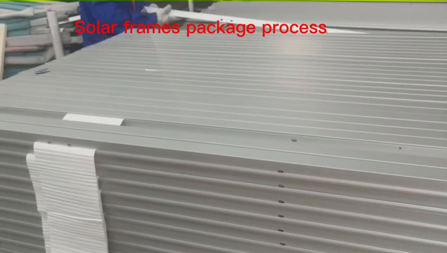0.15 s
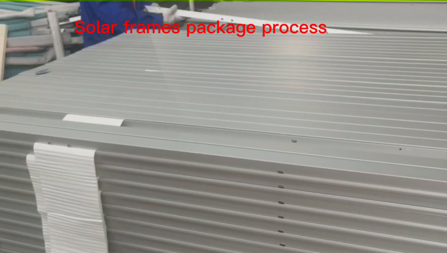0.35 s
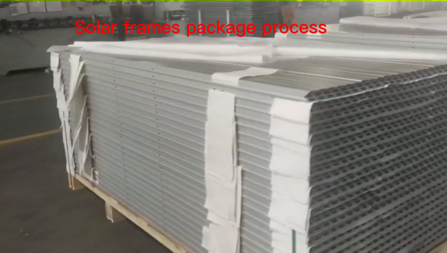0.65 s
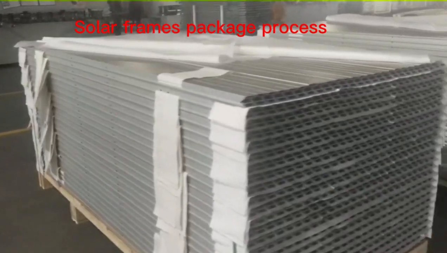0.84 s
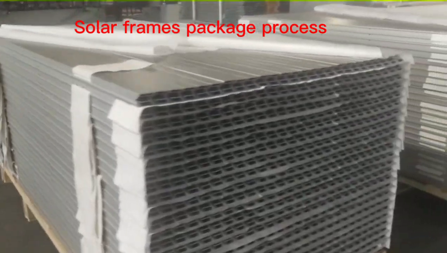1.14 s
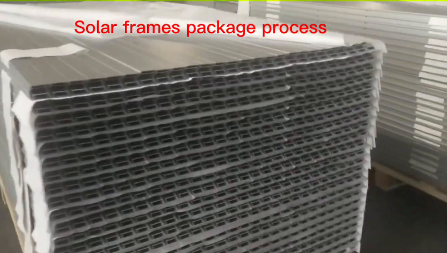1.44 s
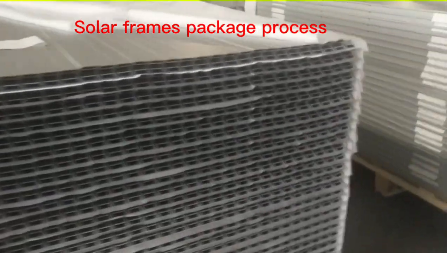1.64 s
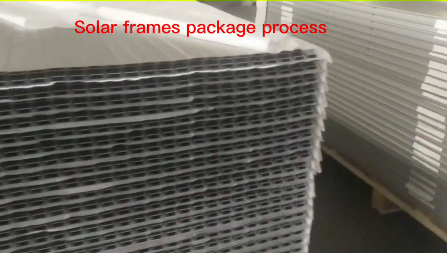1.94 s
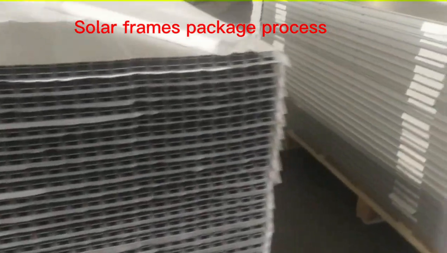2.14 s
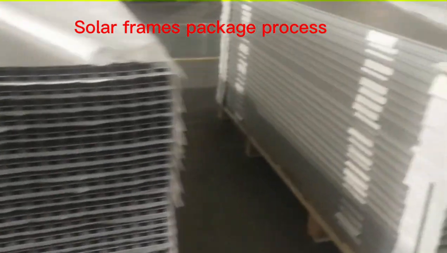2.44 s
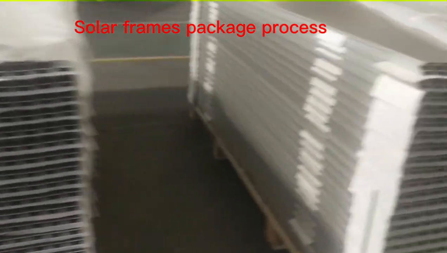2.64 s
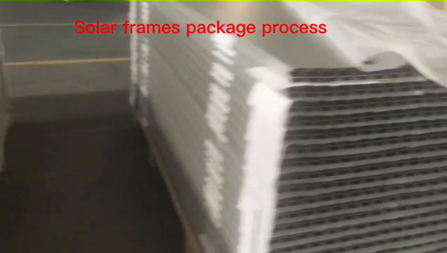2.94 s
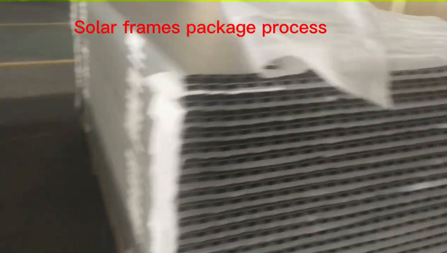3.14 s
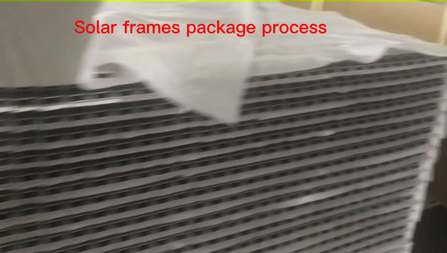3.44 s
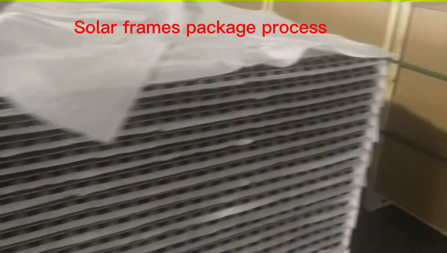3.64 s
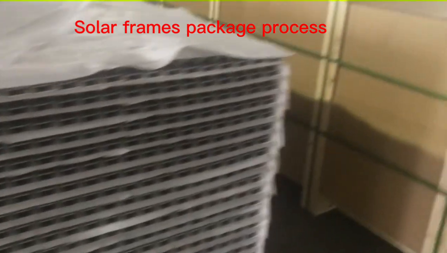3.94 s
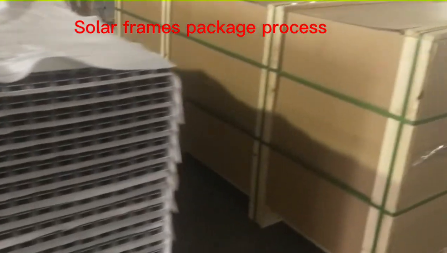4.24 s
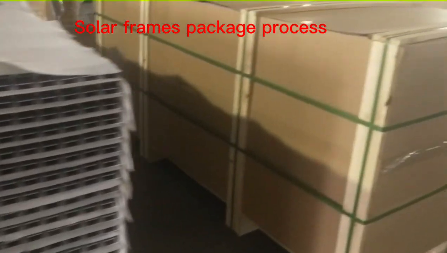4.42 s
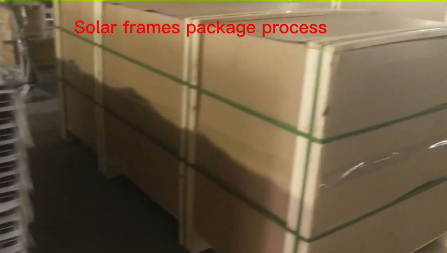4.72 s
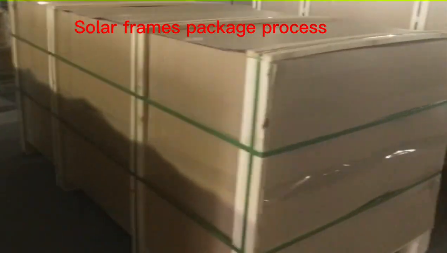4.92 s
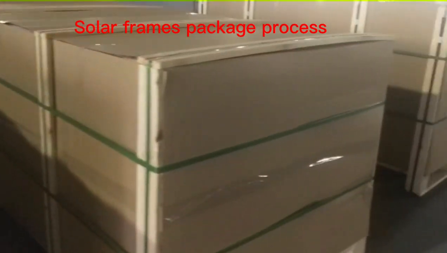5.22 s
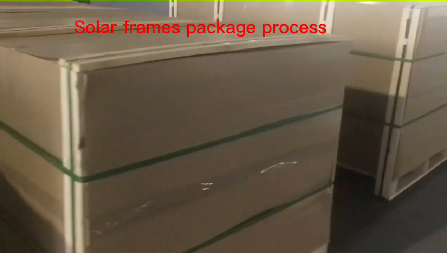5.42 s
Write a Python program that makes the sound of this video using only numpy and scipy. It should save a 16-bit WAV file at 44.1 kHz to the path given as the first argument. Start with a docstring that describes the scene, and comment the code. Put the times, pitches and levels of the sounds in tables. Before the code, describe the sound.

A busy, echoing factory hall heard in mono from a moving handheld microphone. Rough, shrill saw squeals near 3 kHz and their overtones are already under way at the start, sliding slightly downward. At 0.3 s everything cuts to complete silence, returning at 0.5 s, treble first and bass swelling after. A higher squeal around 4.3 kHz rings until about 1.2 s, fading quickly. Softer, trembling squeals overlap from 1.3 to 2.4 s, with gritty rasping at 2.0 and 2.3 s and a faint low boom. At 3.0 s the strongest piercing screech drops in pitch, with a bright rasp, and fades by 4 s, its echo trailing. A thin steady-pitched whine flutters in and out throughout the rest. Motor rumble, low hum and broad airy machine din continue, the rumble growing around 5.2 s. A short falling squeal and sharp scrape arrive at 5.4 s, just before the end.

```python
"""A factory hall where aluminium profiles are sawn: blades squeal and rasp, motors rumble and hum, air hisses.
Squeals are harmonic tones, most sliding down in pitch as the cut loads the blade; the hall smears them.
Rasps and passing noises are banded noise bursts; a thin whine swells and fades; rumble and din are shaped noise.
The sound drops out once near the start, then swells back in under a gain control that ducks loud sound."""
import sys
import numpy as np
from scipy import signal
from scipy.fft import rfft, irfft
from scipy.io import wavfile
from scipy.ndimage import uniform_filter1d, minimum_filter1d

SR = 44100
rng = np.random.default_rng(int(sys.argv[2]) if len(sys.argv) > 2 else 0)


def wrap_up_sound(samples):
    """Save the sound to the file named by the first command line argument, as 16-bit audio."""
    columns = np.atleast_2d(samples).T
    # keep every value between -1 and 1, then stretch to whole-number steps
    tamed = np.clip(columns, -1, 1)
    steps = np.round(tamed * 32767).astype(np.int16)
    wavfile.write(sys.argv[1], SR, steps)


N = 245813
TIME = np.arange(N) / SR  # s

# ways a blade rings, harmonics 1, 2, ...: relative level/dB
SHRILL = [-11.5, 3, -25.5, -33.5]
SMALL_BLADE = [0, -25]
FULL = [-5.5, 1, -16.5, -44.5]
PURE = [0]
PIERCING = [-20.5, 6.5, -43, -40.5]
THIN = [-7.5, 2.2, -14.5]
# squeals: start t/s, length/s, level/dB, fade/(dB/s), bite f/Hz, settled f/Hz, settling time constant/s,
# sway f/Hz, sway depth/share of pitch, jitter/share of pitch, harmonic levels/dB
SQUEALS = [ (-.15, 0.47, -20, 3, 2998, 2862, 0.3, 18.5, .011, 0.0035, SHRILL),
           (0.065, 0.27, -25.5, -9, 2835, 2806, 0.12, 18.5, .007, 0.004, SHRILL),
           (.42, 0.37, -25.5, 0, 4190, 4225, 0.1, 22, .004, 0.004, SMALL_BLADE),
           (0.555, 0.66, -19, 26, 4280, 4370, .04, 22, .031, 0.003, SMALL_BLADE),
           (1.265, 0.6, -26.5, 6, 2998, 2868, 0.18, 22, .007, 0.004, FULL),
           (1.27, 0.3, -33, 10, 5170, 5100, 0.12, 22, .014, 0.007, PURE),
           (1.59, 0.26, -28.5, 0, 2815, 2820, 0.1, 22, .002, 0.004, FULL),
           (1.8, 0.47, -24, 10, 2830, 2848, 0.15, 22, .004, 0.003, THIN),
           (2.0, 0.41, -33, 3, 2780, 2800, .2, 22, .009, 0.005, THIN),
           (1.8, 0.36, -28.5, 3, 5105, 5135, .1, 22, .002, 0.0015, PURE),
           (3.022, 0.545, -15.3, 6, 3020, 2838, .058, 25.4, .0115, 0.004, PIERCING),
           (3.16, 0.14, -20, -2, 2850, 2780, 0.0656, 25.4, .009, 0.004, PIERCING),
           (3.5, 0.49, -27, 11, 2832, 2824, 0.06, 25.4, .007, 0.002, PIERCING),
           (5.368, 0.125, -22.5, 20, 3180, 2740, 0.05, 25.4, .006, 0.005, FULL)]
SPINDLE_HZ = 51.74
SQUEAL_RISE_S, SQUEAL_RELEASE_S = 0.09, 0.049


def squeals(jitter_hz=110, wobble_share=0.0018, throb=0.33, flutter_db=0.5, kick=240, shudder=0.4):
    """A biting blade rings and settles in pitch; sway and spindle turns modulate pitch and level."""
    clock = np.arange(-SR // 2, N) / SR  # early start: the first squeal is already under way
    out = np.zeros(len(clock))
    for (start_s, length_s, level_db, fade_db_per_s, bite_hz, settled_hz, settle_s,
         sway_hz, sway_share, jitter_share, harmonics_db) in SQUEALS:
        on = (clock > start_s) & (clock < start_s + length_s)
        t = clock[on] - start_s
        size = len(t)
        bite = np.minimum(t / SQUEAL_RISE_S, 1) ** 2
        envelope = bite * np.minimum((length_s - t) / SQUEAL_RELEASE_S, 1)
        turn = np.sin(2 * np.pi * (SPINDLE_HZ * t + rng.random()))
        sway_phase = 2 * np.pi * sway_hz * t

        hz = settled_hz + (bite_hz - settled_hz) * np.exp(-t / settle_s)
        bend = sway_share * bite * np.sin(sway_phase)
        bend += wobble_share * turn
        bend += jitter_share * wander(size, jitter_hz)
        phase = 2 * np.pi * np.cumsum(hz * (1 + bend)) / SR
        partials = [gain_of(db) * np.sin(k * phase) for k, db in enumerate(harmonics_db, 1)]
        # teeth kick the lowest partial at random: more jitter, rougher
        partials[0] = partials[0] * evened(1 + kick * jitter_share * wander(size, jitter_hz))

        flutter = gain_of(flutter_db * wander(size, 30))
        grip = evened((1 + throb * turn) * (1 + shudder * np.cos(sway_phase)) * flutter)
        level = np.sqrt(2) * gain_of(level_db - fade_db_per_s * t)
        out[on] += level * envelope * grip * sum(partials)
    return hall(out)[-N:]


HALL_T60_S = 0.85


def hall(x, direct=0.85, early_db=-2, early_t60_s=0.26):
    """Direct sound, quick echoes off the stacks and a long tail: sparse random taps, unit total energy."""
    t = np.arange(SR) / SR
    near, far = rng.choice([-1., 1.], (2, SR)) * (rng.random((2, SR)) < .1)
    early = gain_of(early_db) * evened(near * gain_of(-60 * t / early_t60_s))
    tail = evened(far * gain_of(-60 * t / HALL_T60_S))
    response = (early + tail) / np.sqrt(SR)
    response[0] = direct
    return signal.fftconvolve(x, response / np.linalg.norm(response))[:len(x)]


# teeth rasping through a profile: t/s, length/s, level/dB, tilt/(dB/octave)
RASPS = [(1.988, 0.23, -23.5, 2.5), (2.263, 0.086, -25.5, -0.5), (3.044, 0.18, -28, 14.5),
         (5.415, 0.045, -19.5, 10), (5.46, 0.03, -28, -4)]
# rasp spectrum: f/Hz, relative level/dB
RASP_SPECTRUM = [(500, -41), (1000, 2), (1900, 4), (2700, 0.5), (3600, -6), (4700, -10), (6500, -13.5),
                 (9000, -30.5)]
# resonances of the sawn profile: f/Hz, width at half the dB boost/Hz, boost/dB
PROFILE = [(1064, 20, 9.5), (1790, 13, 10), (2007, 17, 10.5), (2160, 23, 7.5), (2330, 22, 7),
           (2860, 90, 1.5), (5630, 310, 5), (8940, 80, 7)]


def rasps(rise_s=0.031, t60_s=1.0, chatter_db=1):
    """Saw teeth shake the profile: rough noise in its resonances."""
    def colour_db(hz):
        ringing_db = sum(db / (1 + (2 * (hz - f) / width) ** 2) for f, width, db in PROFILE)
        top_db = -np.maximum(hz - 9000, 0) / 16
        return read(RASP_SPECTRUM, hz) + ringing_db + top_db

    out = np.zeros(N)
    for start_s, length_s, level_db, tilt_db in RASPS:
        grind = noise(lambda hz: colour_db(hz) + tilt_db * np.log2(hz + 1))
        out += gain_of(level_db) * grind * burst(start_s, length_s, rise_s, t60_s)
    return out * gain_of(chatter_db * wander(N, 60))


# passing noises, each in one band: a low boom, puffs, scrapes, the sawn profile ringing:
# t/s, length/s, level/dB, centre f/Hz, width at -6 dB/Hz
PASSING_NOISES = [(0.648, 0.12, -31, 2880, 198), (2.28, 0.52, -30, 101, 39),
                  (2.573, 0.22, -34.5, 3380, 623), (2.589, 0.31, -34, 747, 203),
                  (2.774, 0.12, -35, 2500, 202), (3.058, 0.21, -32.5, 2316, 181),
                  (4.406, 0.19, -36, 1270, 156), (4.704, 0.067, -35, 2750, 218),
                  (5.428, 0.03, -27.5, 1785, 130), (5.436, 0.047, -25.5, 2680, 200)]


def passing_noises(rise_s=0.025, t60_s=1.0):
    """Each passing noise is a burst in a single band."""
    out = np.zeros(N)
    for start_s, length_s, level_db, centre_hz, width_hz in PASSING_NOISES:
        banded = noise(lambda hz: -20 * np.log10(1 + (2 * (hz - centre_hz) / width_hz) ** 2))
        out += gain_of(level_db) * banded * burst(start_s, length_s, rise_s, t60_s)
    return out


WHINE_HZ = 3072
# whine level along the way through the hall: t/s, level/dB
WHINE_LEVEL = [(0, -45.5), (.6, -44), (.8, -35), (.9, -51), (1.08, -26.5), (1.17, -50), (1.23, -29),
               (1.3, -46), (1.38, -33), (1.47, -38), (1.66, -42), (1.78, -30), (1.93, -29), (2.17, -35),
               (2.42, -44), (2.55, -30), (2.64, -37.5), (2.75, -28), (2.9, -43), (3.0, -35.5),
               (3.06, -32.5), (3.14, -29.5), (3.5, -44.5), (3.72, -28), (3.85, -37), (3.95, -29),
               (4.03, -27.5), (4.12, -39), (4.2, -29.5), (4.32, -33), (4.38, -40.5), (4.57, -42),
               (4.68, -33.5), (4.82, -26.5), (4.92, -37.5), (5.02, -32), (5.25, -25.5), (5.42, -36),
               (5.57, -30.5)]


def whine(drift_hz=1, standing_db=2.6, standing_hz=12):
    """One thin tone, drifting slightly; its level flutters as on a walk through standing waves."""
    phase = 2 * np.pi * np.cumsum(WHINE_HZ + drift_hz * wander(N, 42)) / SR
    level_db = follow(WHINE_LEVEL, TIME)[0] + standing_db * wander(N, standing_hz)
    return np.sqrt(2) * np.sin(phase) * gain_of(level_db)


# rumble spectrum: f/Hz, relative level/dB
RUMBLE_SPECTRUM = [(20, -22), (35, -27.5), (50, -11.5), (70, -6.5), (100, -3), (150, -2), (220, -7),
                   (400, -12), (900, -43)]
# rumble level: t/s, level/dB
RUMBLE_LEVEL = [(0, -31.5), (.65, -32.5), (.92, -30), (1.4, -37), (2.1, -37.5), (2.3, -32), (3.4, -35.5),
                (4.85, -33.5), (5.2, -25), (5.57, -28.5)]
# hum lines: f/Hz, level/dB
HUM = [(97, -45), (150, -44), (292, -46), (656.5, -41.5), (717.5, -51.5), (1055, -55), (1959, -57)]


def motors(waver_db=-1.5, drift_hz=2.776):
    """Low noise for the rumble; sines wavering in pitch and level for the hum."""
    rumble = noise(lambda hz: read(RUMBLE_SPECTRUM, hz) - hz / 200)
    out = rumble * gain_of(follow(RUMBLE_LEVEL, TIME)[0])
    for hz, level_db in HUM:
        phase = 2 * np.pi * np.cumsum(hz + drift_hz * wander(N, 8.7)) / SR
        out = out + gain_of(level_db) * evened(np.sin(phase) * gain_of(waver_db * wander(N, 5.9)))
    return out


# din spectrum: f/Hz, relative level/dB
DIN_SPECTRUM = [(100, -10.5), (170, 2.5), (300, 7), (480, 0), (700, 1), (1100, -3), (1800, -1), (2700, -1),
                (3500, -3.5), (4700, -4.5), (6300, -4), (7400, -7.5), (8400, -15), (9200, -20.5)]
# din level along the way through the hall: t/s, level/dB
DIN_LEVEL = [(0, -28), (.8, -26), (1.8, -25.5), (2.5, -24.5), (3.3, -27.5), (4.45, -24.5), (4.95, -26),
             (5.57, -24.5)]


def din(patchy_db=1.1, flicker_db=.5, ripple_db=2.0):
    """Air and far machines: drifting patches of noise, coloured by many narrow resonances."""
    frames, hz = N // 512 + 5, np.fft.rfftfreq(2048, 1 / SR)
    real, imaginary, patches = rng.standard_normal((3, frames, len(hz)))
    patches = uniform_filter1d(patches, size=8, axis=0)  # over time
    patches = evened(uniform_filter1d(patches, size=14, axis=1))  # over frequency
    ripple = evened(uniform_filter1d(rng.standard_normal(len(hz)), size=2))
    ripple = ripple * hz / (hz + 500)  # weaker in the bass
    band = hz ** 2 / (hz ** 2 + 70 ** 2) / (1 + (hz / 8900) ** 60)
    shape = band * gain_of(read(DIN_SPECTRUM, hz) + ripple_db * ripple + patchy_db * patches)
    spectrum = (real + 1j * imaginary) * shape
    sound = signal.istft(spectrum.T, nperseg=2048, noverlap=1536)[1][:N]
    return evened(sound) * gain_of(follow(DIN_LEVEL, TIME)[0] + flicker_db * wander(N, 28))


def gain_of(db):
    """Decibels to an amplitude factor."""
    return 10 ** (np.asarray(db) / 20)


def evened(x):
    """Scaled to an rms of 1."""
    return x / np.sqrt(np.mean(x ** 2) + 1e-20)


def read(points, hz):
    """A spectrum table interpolated on a log-frequency axis."""
    f, value = np.transpose(points)
    return np.interp(np.log(hz + 1), np.log(f + 1), value)


def follow(rows, t):
    """Each column of a curve table at the times t."""
    s, *columns = np.transpose(rows)
    return [np.interp(t, s, c) for c in columns]


def wander(size, rate_hz):
    """Random drift cut from a long low-passed noise of rms 1, -6 dB at the rate."""
    hz = np.fft.rfftfreq(2 ** 18, 1 / SR)
    spectrum = rfft(rng.standard_normal(2 ** 18)) / (1 + (hz / rate_hz) ** 4)
    return evened(irfft(spectrum))[:size]


def noise(colour_db):
    """Noise cut from a draw of rms 1 whose spectrum is the function colour_db(Hz)."""
    hz = np.fft.rfftfreq(2 ** 18, 1 / SR)
    spectrum = rfft(rng.standard_normal(2 ** 18)) * gain_of(colour_db(hz))
    return evened(irfft(spectrum))[:N]


def burst(start_s, length_s, rise_s, t60_s):
    """An envelope that rises, holds and dies away as in the hall."""
    decay = gain_of(-60 * np.maximum(TIME - start_s - length_s, 0) / t60_s)
    return np.clip((TIME - start_s) / rise_s, 0, 1) * decay


def scene():
    """Everything heard from between the stacks."""
    return (squeals() + rasps() + passing_noises() + whine() + motors() + din())[None]


TREBLE_SINK_DB, TREBLE_RETURN_S = -15, 0.044  # return: time constant
BASS_SINK_DB, BASS_RETURN_S, BASS_HZ = -22.5, 0.19, 624


def swelled(x):
    """Sound comes back after a gap: the treble first, then the bass."""
    t = np.arange(len(x)) / SR
    bass = signal.sosfiltfilt(signal.butter(2, BASS_HZ, fs=SR, output="sos"), x)
    treble_gain = gain_of(TREBLE_SINK_DB * np.exp(-t / TREBLE_RETURN_S))
    bass_gain = gain_of(BASS_SINK_DB * np.exp(-t / BASS_RETURN_S))
    return (x - bass) * treble_gain + bass * bass_gain


def ducked(x, threshold_db=-18.5, most_db=8.0, slope=1.53, sense_s=0.032, hold_s=0.4, glide_s=0.27):
    """Gain control sinks under loud sound, holds, then recovers."""
    power_db = 10 * np.log10(abs(trailing_mean(x ** 2, sense_s)) + 1e-12)
    over_db = np.clip(slope * (power_db - threshold_db), 0, most_db)
    half = int(hold_s * SR / 2)
    # running maximum over the time just gone
    held_db = -minimum_filter1d(-over_db, 2 * half + 1, origin=half, mode="constant")
    return x * gain_of(-trailing_mean(held_db, glide_s))


def trailing_mean(x, seconds):
    """The mean over the time just gone."""
    t, total = np.arange(len(x)) / SR, np.cumsum(x) / SR
    return (total - np.interp(t - seconds, t, total, left=0)) / seconds


def limited(x):
    """A quick limiter: smoothed gain reduction around peaks above 0.48 of full scale."""
    room = 1 / np.maximum(abs(x) / .48, 1)
    return x * uniform_filter1d(minimum_filter1d(room, size=200), size=200)


SILENT_FROM_S, SILENT_TO_S = .302, .503
EDGE_HZ = 12000


def record(dry):
    """Sound breaks off once, swells back in under gain control; then limiter and low-pass."""
    before, after = TIME < SILENT_FROM_S, TIME > SILENT_TO_S
    out = np.zeros(N)
    out[before] = dry[0, before]
    out[after] = ducked(swelled(dry[0, after]))
    low_pass = signal.firwin(511, EDGE_HZ, window=("kaiser", 9), fs=SR)
    return signal.oaconvolve(limited(out), low_pass, "same")[None]


dry = scene()
out = record(dry)
wrap_up_sound(out)
```